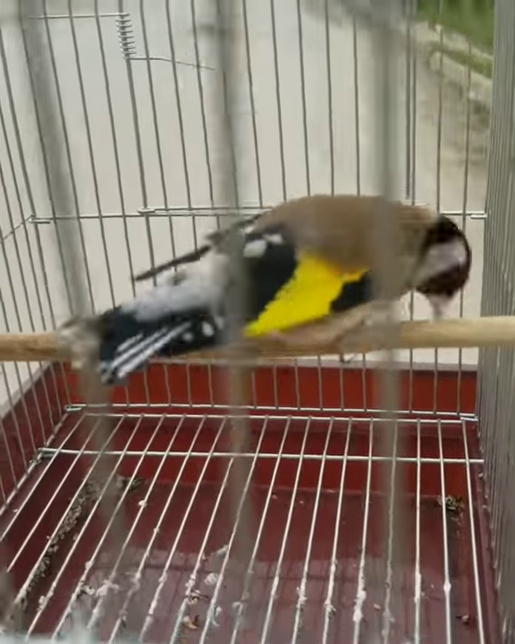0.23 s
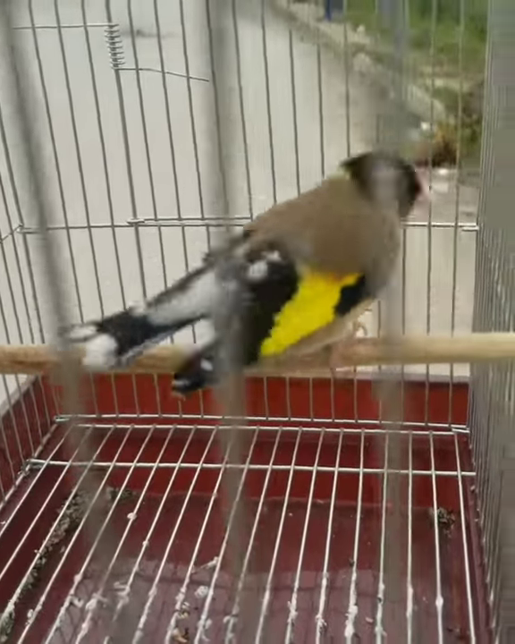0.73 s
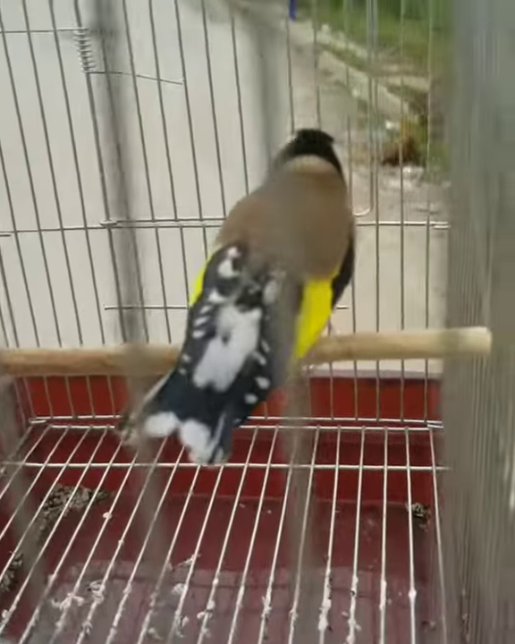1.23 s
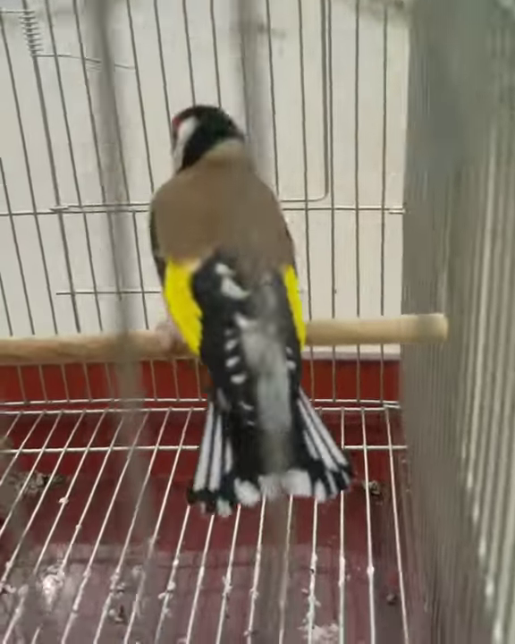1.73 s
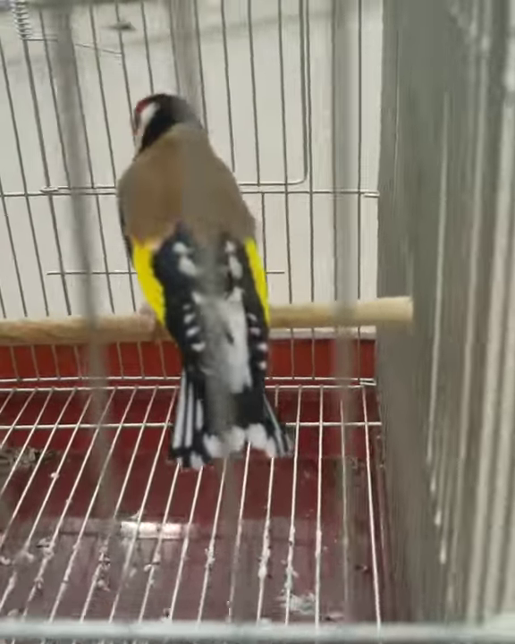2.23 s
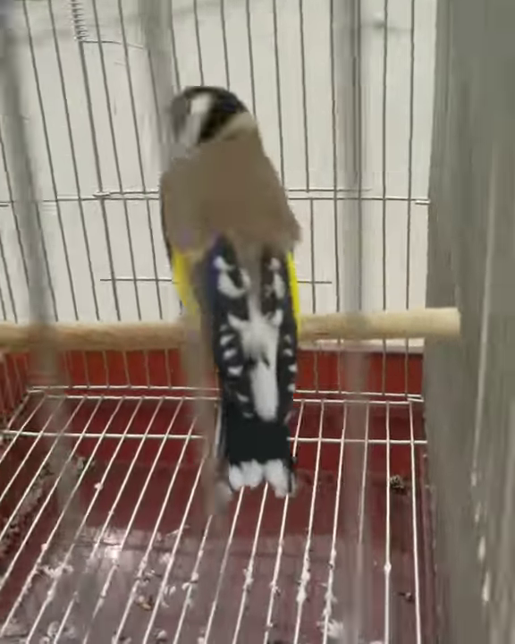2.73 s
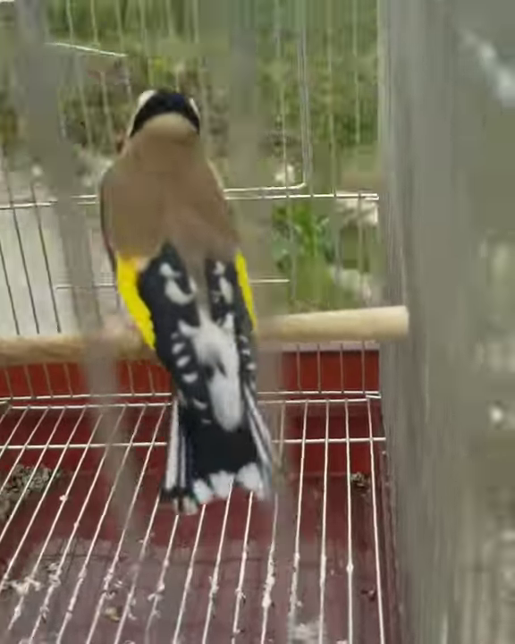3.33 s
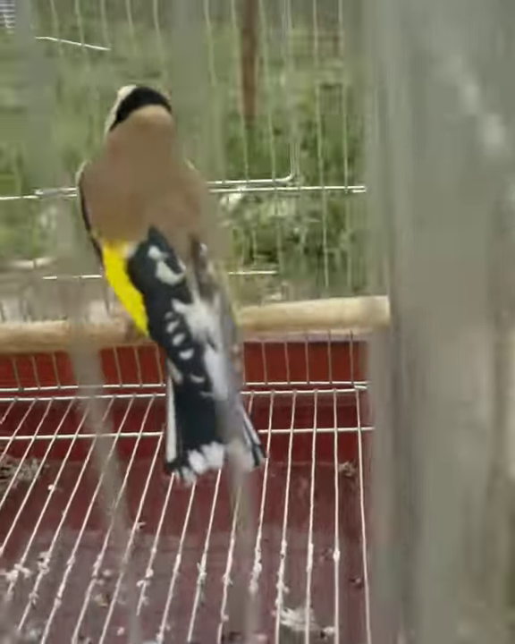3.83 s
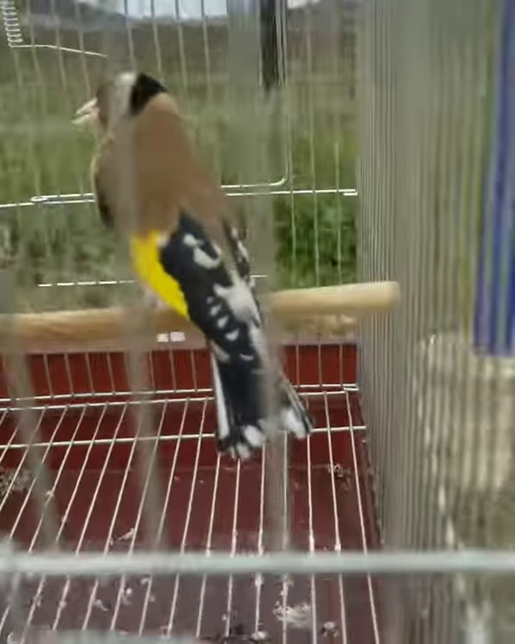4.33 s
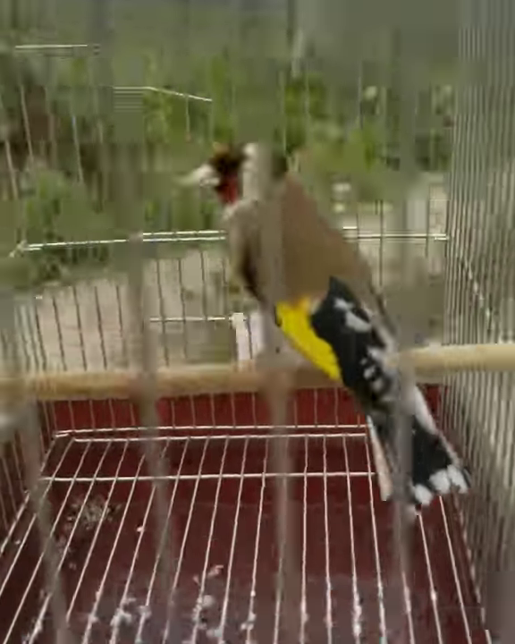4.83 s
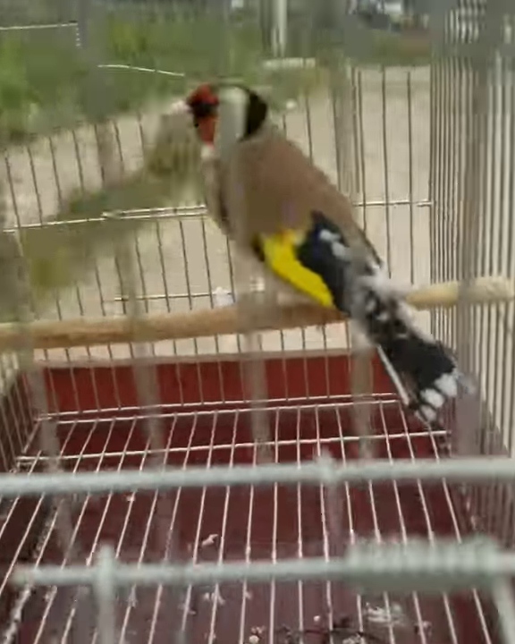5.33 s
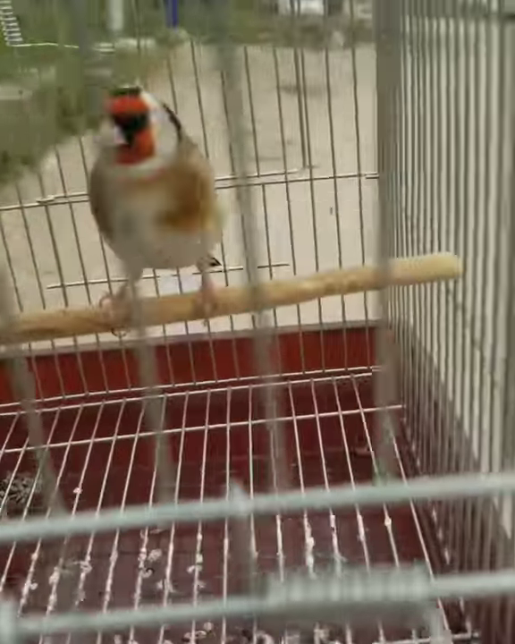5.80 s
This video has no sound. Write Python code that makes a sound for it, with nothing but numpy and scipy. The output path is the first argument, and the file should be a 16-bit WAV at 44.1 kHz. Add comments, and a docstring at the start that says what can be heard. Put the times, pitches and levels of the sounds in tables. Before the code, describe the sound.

A quiet outdoor hush with slight hiss and very faint distant bird peeps. From about 0.3 to 0.8 seconds, a finch wipes its beak on the perch: small, dry, irregular scrapes with a light ring of cage wire. At 1.5 seconds it sings close by, two or three quick upward chirps running into a harsh buzz of about a tenth of a second, ending near 1.9. A pause follows, with soft low wind thumps. At 3.3 it begins again with rising chirps, then from 3.4 to 4.3 a very fast trill alternates high and low notes, swelling then weakening and sinking in pitch. From 4.3 to 5.0 come louder, piercing whistles, some held high, others sweeping upward, while wind flutters at the microphone. The song stops abruptly; from 5.4 faint feathers rustle, and tiny claw ticks from a hop sound around 5.7 to 5.95.

```python
"""A caged finch sings outdoors close to a two-port camera: a chirp group with a buzz, then a twittering phrase.
Both halves of its voice organ whistle as sine sweeps, often at once; squeezing their sum adds overtones.
Beak wiping and hops are noise scrapes over decaying wire tones, and the feathers are grainy treble noise.
Far birds are faint sine glides; wind buffets the ports as low noise over an outdoor hush of shaped noise."""
import sys
import numpy as np
from scipy import signal
from scipy.fft import rfft, irfft, next_fast_len
from scipy.io import wavfile
from scipy.ndimage import uniform_filter1d, map_coordinates

SR = 44100
rng = np.random.default_rng(int(sys.argv[2]) if len(sys.argv) > 2 else 0)


def pcm_store(signal):
    """Save signal as 16-bit PCM."""
    levels = np.round(np.clip(np.atleast_2d(signal), -1, 1) * 32767)
    wavfile.write(sys.argv[1], SR, levels.astype(np.int16).T)


N = 267386


def amp(db):
    """Decibel law: 20 dB is a factor of ten in amplitude."""
    return 10 ** (np.asarray(db) / 20)


def unit(x):
    """Normalization to an rms of 1."""
    return x / np.sqrt(np.mean(x ** 2) + 1e-20)


def along(points, hz):
    """Interpolation of (frequency [Hz], value) points on a logarithmic frequency axis."""
    f, v = np.transpose(points)
    return np.interp(np.log(hz + 1), np.log(f + 1), v)


def curves(rows):
    """Linear interpolation in time: one value per sample for each column after the time."""
    s, *cols = np.transpose(rows)
    return [np.interp(np.arange(N) / SR, s, c) for c in cols]


def wobble(rate, count=N):
    """Band-limited random modulation: a smooth curve through rate random knots a second."""
    knots = rng.standard_normal(int(count * rate / SR) + 4)
    return map_coordinates(knots, [np.arange(count) * rate / SR])


def filtered(x, response):
    """Linear filtering: the spectrum of x times a complex response of frequency."""
    m = next_fast_len(N + SR // 2)
    return irfft(rfft(x, m) * response(np.fft.rfftfreq(m, 1 / SR)), m)[..., :N]


def add(track, s, sound):
    """Superposition: mix a short sound in at time s."""
    part = track[max(round(s * SR), 0):][:len(sound)]
    part += sound[:len(part)]


def rush(spectrum, alike, patchy_db):
    """Partly coherent stereo noise of rms 1, with patches of random gain in time and frequency."""
    z = signal.stft(rng.standard_normal((2, N)), nperseg=512)[2]
    field = uniform_filter1d(rng.standard_normal(z.shape[1:]), 6, 0)
    field = uniform_filter1d(field, 14, 1)
    pair = signal.istft(z * amp(patchy_db * unit(field)), nperseg=512)[1][:, :N]

    def mid_side(hz):
        # the mid and side shares set the likeness of the two ports
        angle = np.arccos(np.clip(along(alike, hz), -1, 1)) / 2
        return amp(along(spectrum, hz)) * [np.cos(angle), np.sin(angle)]

    mid, side = filtered(pair, mid_side)
    return unit(np.array([mid + side, mid - side]))


# phase by which the left port leads the right: (frequency [Hz], lead [rad])
PHASE_LEAD = [(300, .3), (1000, 1.3), (2400, 1.8), (2750, 2.2), (3100, 3.3), (3400, 4.1), (4700, 5.7),
              (6100, 7.7), (7000, 8.6), (7800, 7.6), (8700, 9.6), (9600, 12.4), (11900, 17.5), (15500, 23)]


def ports(x, shade):
    """Interaural-style cues: the left port leads in phase and the camera body shades each port differently."""
    def half(hz):
        return amp(along(shade, hz) / 2) * np.exp(.5j * along(PHASE_LEAD, hz) * (hz > 0))

    return filtered(x, lambda hz: np.array([half(hz), 1 / half(hz)]))


def echoes(x, t60, delay_s, wobble_hz):
    """Diffuse reverberation: a decaying tail at each port, made uneven and blurred by a random wobble."""
    t = np.arange(SR // 2) / SR
    tail = rng.standard_normal((2, len(t))) * amp(-60 * t / t60) * (t > delay_s)
    gain = np.array([unit(wobble(wobble_hz)), unit(wobble(wobble_hz))])
    return gain * signal.fftconvolve(x, tail / np.linalg.norm(tail[0]), axes=1)[:, :N]


# slow swell of the hush: (time [s], level before a common lift [dB])
HUSH_SWELL = [(0.0, -54.5), (0.91, -53), (3.44, -56.5), (6.06, -55.5)]
# colour of the hush: (frequency [Hz], relative spectral level [dB])
HUSH_SPECTRUM = [(90, -34.5), (150, -21), (200, -12), (270, -15), (370, -8), (700, -12), (1000, -11),
                 (1300, -18.5), (1900, -21), (2300, -33), (3500, -35.5), (4600, -64)]
# likeness of the hush at the two ports once the lag is removed: (frequency [Hz], share [0-1])
HUSH_LIKENESS = [(150, 0.59), (700, 0.75), (2500, 1), (6000, 0.075), (15000, 0.072)]
# colour of the microphone hiss: (frequency [Hz], relative spectral level [dB])
HISS_SPECTRUM = [(2500, 4.5), (3500, -1), (4800, -2), (5800, -10), (6400, 0), (8200, -2), (9300, -26.5),
                 (11000, -9.5), (13400, -10.5), (14000, -1), (14600, -6), (15900, -8.5)]


def hush():
    """Ambient noise field: far traffic and leaves as coloured noise over the microphone hiss."""
    level_db, = curves(HUSH_SWELL)
    level = amp(level_db + 4.5 + 1.2 * wobble(5.2))  # lifted 4.5 dB, gently unsteady
    pair = level * rush(HUSH_SPECTRUM, HUSH_LIKENESS, patchy_db=2.0)
    hiss = rush(HISS_SPECTRUM, [(5000, 0.13)], patchy_db=1)
    return ports(pair, [(1000, 0)]) + amp(-65.5) * hiss


# gusts: (time [s], rumble level [dB], flutter level [dB], left minus right [dB])
GUSTS = [(0, -51.5, -56, 20.5), (.57, -39, -54, -0.5), (.85, -49, -54, 3.5), (1.62, -40, -51, -3.5),
         (1.9, -49, -61.5, 12), (2.5, -47.5, -55, 17.5), (2.68, -36.5, -50, 2), (2.85, -39, -47.5, 1),
         (3.12, -36, -44, 7.5), (3.26, -43, -61.5, 5.5), (3.45, -31, -45, 1.5), (3.7, -50.5, -61.5, -9),
         (4.0, -44, -53.5, 1), (4.18, -42, -35, -5), (4.44, -40.5, -36, 7), (4.55, -49, -48, 6.5),
         (4.67, -38, -37, 1.5), (4.85, -41.5, -41, 1.5), (5.02, -31.5, -37.5, -1), (5.12, -46.5, -75, -1.5),
         (6.06, -53.5, -64, -6)]
# colour of the slow thumps: (frequency [Hz], relative spectral level [dB])
RUMBLE_SPECTRUM = [(12, -35.5), (20, -19), (43, 1.5), (81, 2), (145, -7), (300, -26.5), (390, -51),
                   (660, -120)]
# colour of the faster flutter: (frequency [Hz], relative spectral level [dB])
FLUTTER_SPECTRUM = [(60, -59), (100, -16.5), (170, 5), (350, 3.5), (600, -4), (900, -39.5), (1500, -120)]


def wind():
    """Turbulent pressure noise: eddies reach the ports almost independently as rumble and faster flutter."""
    rumble_db, flutter_db, pan_db = curves(GUSTS)
    side = amp(np.array([pan_db, -pan_db]) / 2)

    def lumps(rate, db):
        return amp(db * np.array([wobble(rate), wobble(rate)]))

    rumble = unit(lumps(16, 3) * rush(RUMBLE_SPECTRUM, [(30, .2)], patchy_db=.8))
    flutter = unit(lumps(30, 3.5) * rush(FLUTTER_SPECTRUM, [(30, 0.089)], patchy_db=2.5))
    return side * (amp(rumble_db) * rumble + amp(flutter_db) * flutter)


def glide(ms, start_hz, end_hz, bend, narrow):
    """Frequency modulation: a complex sine sweep under an arched swell; bend over 1 sweeps fast first."""
    u = np.linspace(0, 1, int(ms * SR / 1000))
    pitch = end_hz + (start_hz - end_hz) * (1 - u) ** bend
    turns = np.cumsum(pitch) / SR + rng.uniform()
    return np.sin(np.pi * u) ** narrow * np.exp(2j * np.pi * turns)


# far birds: (start [s], length [ms], start pitch [Hz], end pitch [Hz], peak level before the ports [dB])
FAR_CALLS = [(0.005, 48, 4230, 4390, -61), (1.037, 24.7, 4900, 3900, -57), (1.045, 29, 4190, 5120, -67),
             (1.07, 20, 3560, 3380, -57), (1.37, 69, 2860, 3560, -60), (2.72, 34, 3380, 3460, -63),
             (2.785, 37, 4175, 4650, -65), (2.785, 31, 5000, 5150, -69)]


def far_birds():
    """Frequency-swept pure tones: faint single whistles from the field."""
    calls = np.zeros(N)
    for s, ms, start_hz, end_hz, db in FAR_CALLS:
        add(calls, s, amp(db) * glide(ms, start_hz, end_hz, bend=0.93, narrow=1.3).real)
    return calls


# beak and claws on the perch: (time [s], strength [dB])
CONTACTS = [(0.3037, -41), (0.36, -43.5), (0.4226, -47), (0.444, -42), (0.504, -46.5), (0.5294, -51),
            (0.603, -41.5), (0.6537, -43), (0.7393, -43), (0.761, -43.5), (0.795, -45), (0.8195, -55.5),
            (5.6947, -66), (5.798, -61), (5.853, -50.5), (5.8694, -54), (5.8946, -45), (5.9118, -56),
            (5.938, -51.5)]
# resonances of the cage wires, nominal: (frequency [Hz], relative level [dB], 60 dB decay time [s])
WIRE_MODES = [(1580, 2, 0.066), (2340, -4, 0.063), (2880, 2, 0.16), (3400, -9, 0.15), (4050, -2, 0.15),
              (6300, -12, 0.08), (6850, -7, 0.1), (8500, -16, .04)]
# breathy edge of the whistle, which also tilts the cage and the feathers: (frequency [Hz], relative level [dB])
AIR_SPECTRUM = [(1800, -32), (2600, 1), (6000, -4.5), (8500, -0.5), (9700, -20.5), (12000, -2.5),
                (16000, -35)]


def cage():
    """Modal excitation: each contact is a click and a grainy scrape that ring the wires at new strengths."""
    sound, t = np.zeros(N), np.arange(SR // 8) / SR
    for s, db in CONTACTS:
        ring = 0
        for hz, level, t60 in WIRE_MODES:
            decay = amp(level + 4.4 * np.tanh(rng.normal()) - 60 * t / t60)
            ring = ring + decay * np.sin(2 * np.pi * hz * (1 + rng.normal(0, 0.0167)) * t)
        click = amp(-60 * t / 0.0062)
        grains = 0.47 * amp(-60 * t / 0.16 + 1.0 * wobble(250, len(t)))
        scrape = (click + grains) * rng.standard_normal(len(t))
        add(sound, s, amp(db) * (amp(-11) * ring * wobble(194, len(t)) + amp(-6.5) * scrape))
    return filtered(sound, lambda f: amp(along(AIR_SPECTRUM, np.maximum(f, 2400)) / 3) * (f > 900))


# In the note tables pitches are nominal, before smoothing, and levels are relative, before airflow and ports.
# free whistles: (start [s], length [ms], start pitch [Hz], end pitch [Hz], bend [over 1 glides fast first],
# peak level [dB], place of the peak [0-1], fall of the swell half a note from the peak [dB])
FREE_WHISTLES = [(1.511, 23, 3600, 7400, 1.4, -41.5, 0.3, 2),
                 (1.5176, 24, 2400, 3714, 2.4, -17, 0.59, 12.5),
                 (1.5203, 25, 4300, 4754, 2.5, -15.5, 0.6, 20),
                 (1.6364, 26, 2420, 2780, 1.5, -25, 0.83, 5.5), (1.654, 14, 3900, 5310, 1.8, -40, .3, 0.5),
                 (1.656, 35, 2300, 2815, 1.8, -22.5, 0.52, 16.5),
                 (1.709, 43, 3050, 4555, 0.84, -20.5, .55, 12.5),
                 (1.7108, 38, 2500, 4010, 0.83, -19, 0.6, 13.5),
                 (1.715, 23, 4060, 4570, 0.65, -29, .45, 18.5),
                 (3.267, 38, 4307, 5278, 2.5, -30.5, 0.2, 4.5),
                 (3.267, 15.6, 4365, 6190, 1.362, -38, 0.4, 12),
                 (3.2661, 24, 2400, 4000, 1.8, -26, 0.31, 23.5),
                 (3.343, 69, 2520, 4310, 1.25, -21, 0.47, 13.5),
                 (3.344, 68, 2950, 4550, 1.9, -13, 0.9, 16.5), (4.302, 83, 2840, 3146, 1.5, -25, 0.41, 21),
                 (4.305, 53.5, 2590, 2817, 1, -21.5, 0.6, 11.5),
                 (4.379, 27, 2800, 5480, 2.6, -13.5, 0.34, 24.5),
                 (4.386, 27, 4400, 4610, 0.75, -19, 0.25, 7.5), (4.418, 51.5, 6130, 6070, 1, -12, 0.61, 38),
                 (4.4846, 39, 5690, 5085, 4, -11.5, 0.68, 19), (4.561, 97, 2700, 4160, 1.2, -21, .48, 15),
                 (4.562, 95, 2980, 4870, .85, -12.5, 0.9, 13.5),
                 (4.685, 37.5, 6090, 5870, 1.3, -8, 0.71, 35.5),
                 (4.748, 12, 2300, 3657, 1.2, -23.5, .6, 7.5),
                 (4.7514, 31, 2500, 5156, 2.6, -11.5, 0.57, 14),
                 (4.7735, 25, 2921, 5340, 2.1, -10.5, 0.5, 17.5),
                 (4.779, 18, 4060, 5140, 1.4, -15.5, 0.14, 4), (4.8413, 28, 2920, 3750, 1.2, -33.5, .7, 2),
                 (4.84, 41, 2320, 3620, 1.6, -20.5, 0.6, 34.5),
                 (4.905, 47, 6480, 5403, 1.6, -7, 0.68, 35.5),
                 (4.9099, 21, 8430, 6050, 0.85, -22.5, 0.6, 9.5),
                 (4.972, 10, 2507, 3694, 1.8, -18.5, 0.08, 6), (4.9775, 27, 2405, 4740, 2.6, -16, .5, 5),
                 (4.996, 22, 3010, 4773, 2.2, -15.5, .35, 12.5),
                 (5.007, 19, 4350, 4120, 1, -17.5, 0.08, 8.5)]
# trill, high notes that sag: (start [s], pitch [Hz], peak level [dB], place of the peak [0-1])
HIGH_NOTES = [(3.4267, 5050, -20, 0.46), (3.5158, 4917, -14, 0.48), (3.604, 4860, -11, 0.6),
              (3.692, 4840, -10.5, 0.6), (3.7797, 4798, -10.5, 0.56), (3.8707, 4735, -12, 0.47),
              (3.9602, 4647, -13.5, 0.5), (4.0542, 4300, -15.5, .35), (4.1478, 4173, -19, 0.5),
              (4.2482, 4100, -21.5, .3)]
HIGH_MS, HIGH_FROM, HIGH_TO, HIGH_BEND = 21.2, 1.009, 0.97, .7  # length [ms], pitch ratios, bend
HIGH_FALL_DB, HIGH_ATTACK_MS = 7, 2
# trill, low notes that drop into a hook: (start [s], lowest pitch [Hz], peak level [dB])
HOOK_NOTES = [(3.4684, 3470, -11), (3.5557, 3400, -10), (3.645, 3374, -10.5), (3.7319, 3402, -11.5),
              (3.8229, 3340, -12.5), (3.9131, 3266, -13.5), (4.005, 3181, -14), (4.0991, 3086, -16.5),
              (4.1954, 3003, -16)]
HOOK_MS, HOOK_FROM, HOOK_TO = 27.3, 1.325, 1.07  # length [ms], pitch ratios
HOOK_TURN, HOOK_PEAK = .44, 0.45  # places in the note [0-1]
HOOK_FALL_DB, HOOK_ATTACK_MS, HOOK_SHELF_DB = 7.5, 2.2, -15
HOOK_RISE = 9  # multiplies the dB curvature of the swell before its peak
# thin arches over a held note: (start [s], start pitch [Hz], top pitch [Hz], end pitch [Hz], peak level [dB])
ARCH_NOTES = [(4.4155, 6300, 8800, 6500, -37), (4.6786, 4507, 8695, 6634, -21.5)]
ARCH_MS, ARCH_PEAK, ARCH_FALL_DB, ARCH_SHELF_DB = 26, .2, 90, -16.5
ATTACK_MS, SHELF_DB = 4, -26  # shelf: a thin tone holds under each swell
RELEASE = 0.33  # share of a note spent dying away


def whistles():
    """Joint pitch and amplitude modulation: every note as start, pitch curve and swell."""
    notes = []

    def note(s, ms, shape, db, peak, fall_db, attack_ms=ATTACK_MS, shelf_db=SHELF_DB, rise=1):
        """Envelope shaping: quick start and stop round one swell."""
        u = np.linspace(0, 1, int(ms * SR / 1000))
        edges = np.clip(u * ms / attack_ms, 0, 1) * np.clip((1 - u) / RELEASE, 0, 1)
        hump = amp(-fall_db * np.where(u < peak, rise, 1) * (2 * (u - peak)) ** 2)
        swell = np.sin(edges * np.pi / 2) ** 2 * amp(db) * (hump + amp(shelf_db))
        pitch = uniform_filter1d(shape(u), len(u) // 8 + 1, mode="nearest")
        notes.append((s, pitch, swell))

    for s, ms, start_hz, end_hz, bend, *swell in FREE_WHISTLES:
        note(s, ms, lambda u: end_hz + (start_hz - end_hz) * (1 - u) ** bend, *swell)
    for s, hz, db, peak in HIGH_NOTES:
        note(s, HIGH_MS, lambda u: hz * (HIGH_TO + (HIGH_FROM - HIGH_TO) * (1 - u) ** HIGH_BEND),
             db, peak, HIGH_FALL_DB, HIGH_ATTACK_MS)
    for s, hz, db in HOOK_NOTES:
        note(s, HOOK_MS, lambda u: hz * np.interp(u, [0, HOOK_TURN, 1], [HOOK_FROM, 1, HOOK_TO]),
             db, HOOK_PEAK, HOOK_FALL_DB, HOOK_ATTACK_MS, HOOK_SHELF_DB, HOOK_RISE)
    for s, start_hz, top_hz, end_hz, db in ARCH_NOTES:
        note(s, ARCH_MS, lambda u: top_hz - (top_hz - np.where(u < .5, start_hz, end_hz)) * (2 * u - 1) ** 2,
             db, ARCH_PEAK, ARCH_FALL_DB, HOOK_ATTACK_MS, ARCH_SHELF_DB)
    return notes


# upward flicks of one buzz stroke, nominal: (delay [ms], length [ms], start pitch [Hz], end pitch [Hz],
# level relative to the stroke [dB])
BUZZ_FLICKS = [(-1, 6, 2200, 6600, -8), (1.3, 7.7, 3500, 4900, -4.5), (6, 3.4, 3800, 6900, -18.5),
               (.5, 6.6, 2600, 3900, -13.5), (3.5, 5, 5300, 6100, -8.5)]
BUZZ_S, BUZZ_PERIOD_MS, BUZZ_STROKES = 1.7745, 9.45, 10
BUZZ_DB, BUZZ_GROWS, BUZZ_LAST_DB = -9, 2, -13  # full level, growth in strokes, weakening of the last
# second and third harmonics follow the pitch sung: (whistle pitch [Hz], level re the whistle's peak [dB])
SECOND_HARMONIC = [(2500, -15), (3000, -34.5), (3500, -35), (4300, -36.5), (4800, -42), (5200, -33.5),
                   (5700, -18), (6200, -27), (7500, -53.5)]
THIRD_HARMONIC = [(2500, -58), (3400, -40), (4200, -34.5), (4700, -43), (5100, -27.5), (5500, -58.5),
                  (7000, -69)]
FOURTH_DB = -10  # fourth harmonic relative to the third


def finch():
    """Nonlinear mixing: two whistles share one throat; squeezing their sum makes overtones and sum tones."""
    voice, squared, cubed, flow, power = np.zeros((5, N), complex)

    def sing(s, tone, second_db, third_db):
        """Power-law distortion: share one whistle among the pure, squared and cubed paths."""
        size = np.abs(tone) + 1e-9
        grown = size * (size / size.max()) ** 0.28  # overtones grow a little faster than the whistle
        add(voice, s, tone)
        add(squared, s, tone / size * np.sqrt(amp(second_db) * grown))
        add(cubed, s, tone / size * np.cbrt(amp(third_db) * grown))
        add(flow, s, size)
        add(power, s, size ** 2)

    for s, pitch, swell in whistles():
        n = len(pitch)
        turns = np.cumsum(pitch * (1 + 0.0037 * wobble(580, n))) / SR + rng.uniform()
        # uneven airflow: a fuzzy skirt and a lumpy swell
        grain = 1 + amp(-25) * wobble(1500, n) + amp(-20) * wobble(250, n)
        tone = swell * grain * np.exp(2j * np.pi * turns)
        sing(s, tone, along(SECOND_HARMONIC, pitch), along(THIRD_HARMONIC, pitch))

    for k in range(BUZZ_STROKES):
        s = BUZZ_S + k * BUZZ_PERIOD_MS / 1000
        growth_db = 20 * np.log10(1 - np.exp(-(k + 1) / BUZZ_GROWS))
        db = BUZZ_DB + growth_db + BUZZ_LAST_DB * (k + 1 == BUZZ_STROKES)
        for delay_ms, ms, start_hz, end_hz, flick_db in BUZZ_FLICKS:
            tune = 1 + 0.0067 * rng.standard_normal()
            late_ms = 0.24 * rng.standard_normal()
            flick = amp(db + flick_db) * glide(ms, start_hz * tune, end_hz * tune, bend=1.4, narrow=2.5)
            flick *= 1 + .22 * wobble(900, len(flick))
            sing(s + (delay_ms + late_ms) / 1000, flick, second_db=-32.5, third_db=-42)

    flutter = 1 + 0.27 * wobble(500)  # the overtones are unsteady
    fourth = amp(FOURTH_DB) * cubed ** 4 / (np.abs(cubed) + 1e-9)
    overtones = flutter * (squared ** 2 + cubed ** 3 + fourth)
    strands = amp(10.0) * cubed ** 2 * cubed.conj()  # difference tones beside two close whistles
    overlap = np.sqrt(np.abs(flow ** 2 - power))  # two airstreams at once are far more turbulent
    air = amp(-44) * flow.real + amp(-36) * overlap
    noise = filtered(rng.standard_normal(N), lambda hz: amp(along(AIR_SPECTRUM, hz)))
    return (voice + overtones + strands).real + air * unit(noise)


# feather rustles: (middle [s], half length for a 10 dB fall [s], level before graininess [dB])
RUSTLES = [(5.4, .2, -73), (5.66, .15, -78), (5.89, .08, -66)]


def feathers():
    """Friction noise: a faint grainy treble rustle in Gaussian swells."""
    t = np.arange(N) / SR
    level = sum(amp(db - 10 * ((t - s) / half_s) ** 2) for s, half_s, db in RUSTLES)
    return level * amp(1.7 * wobble(110)) * rush(AIR_SPECTRUM, [(5000, 0.4)], patchy_db=3.0)


# shading of the birds and the cage by the camera body: (frequency [Hz], left minus right [dB])
BIRD_SHADE = [(2400, 1.5), (2750, 0), (3100, -6.5), (3500, -1), (4000, -1.5), (4800, 0), (6000, 0.5),
              (8000, 5.5), (15000, 1)]


def scene():
    """Superposition of direct sound, reflections and background noise at the two ports."""
    bird = ports(finch() + cage(), BIRD_SHADE)
    far = ports(far_birds(), BIRD_SHADE)
    near_walls = amp(-22) * echoes(bird, t60=.06, delay_s=.007, wobble_hz=70)
    street = amp(-43) * echoes(bird, t60=.35, delay_s=.02, wobble_hz=300)
    far_echoes = amp(-7.0) * echoes(far, t60=0.24, delay_s=0.014, wobble_hz=85.0)
    return bird + near_walls + street + far + far_echoes + feathers() + wind() + hush()


TOP_HZ = 15900


def record(dry):
    """Band limitation: an ideal low-pass keeps nothing above the camera's limit."""
    return filtered(dry, lambda hz: hz < TOP_HZ)


dry = scene()
out = record(dry)
pcm_store(out)
```